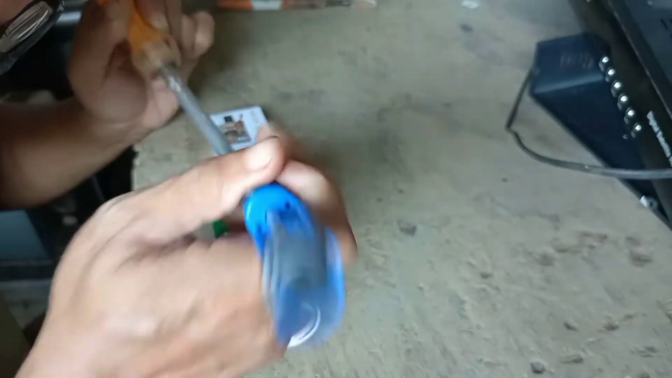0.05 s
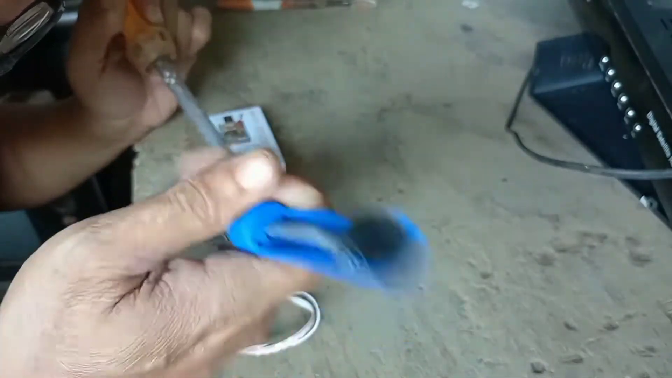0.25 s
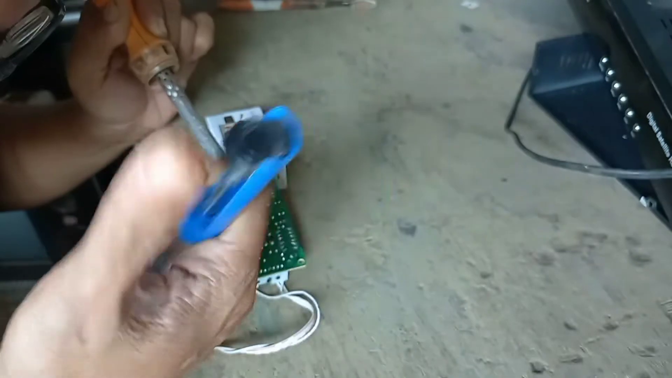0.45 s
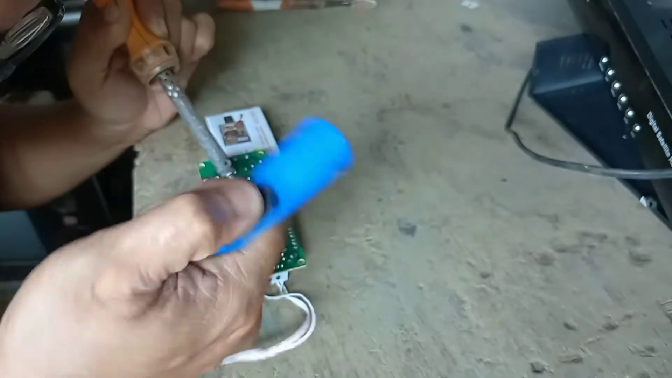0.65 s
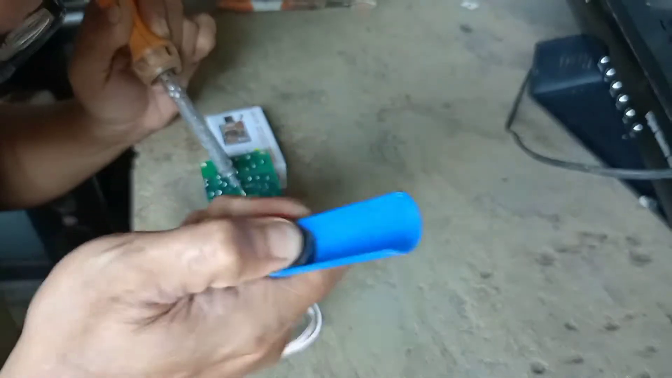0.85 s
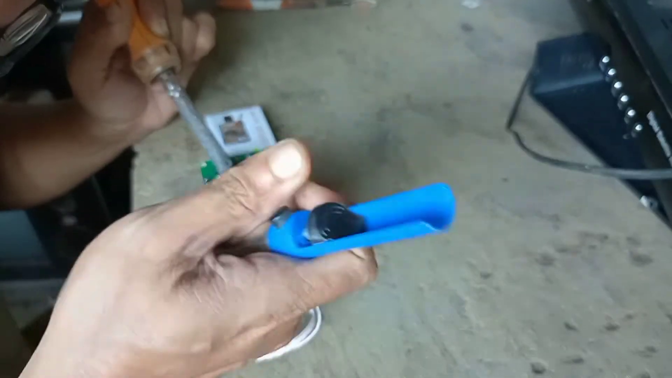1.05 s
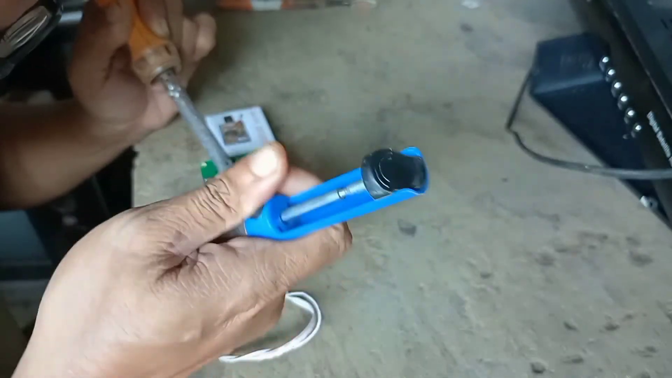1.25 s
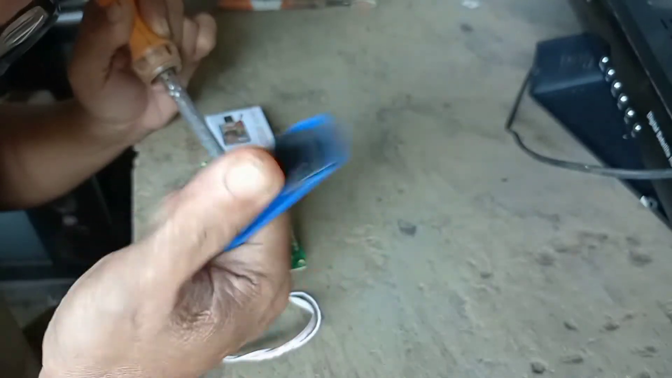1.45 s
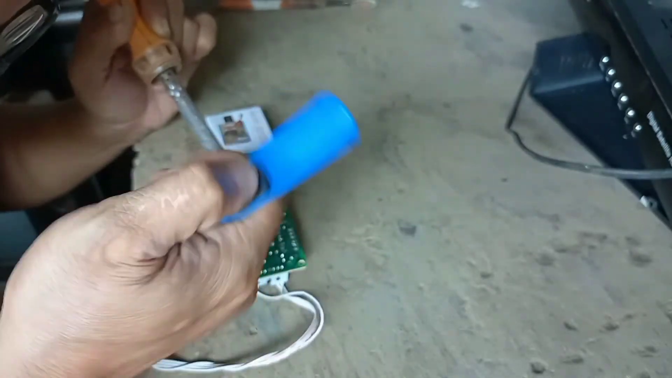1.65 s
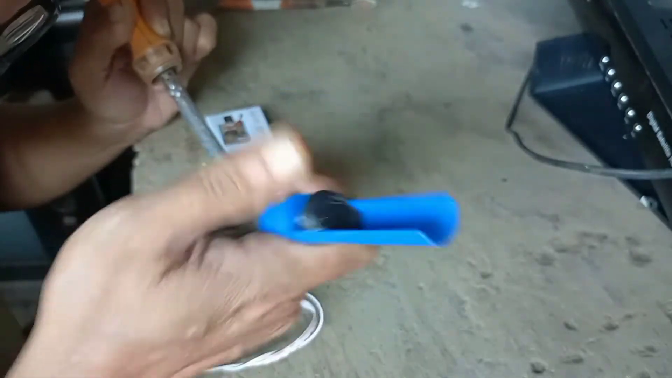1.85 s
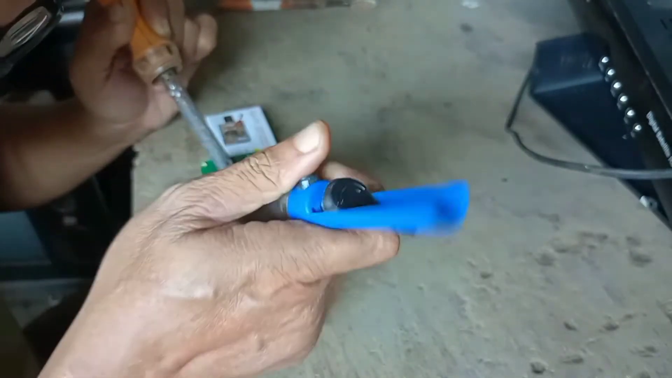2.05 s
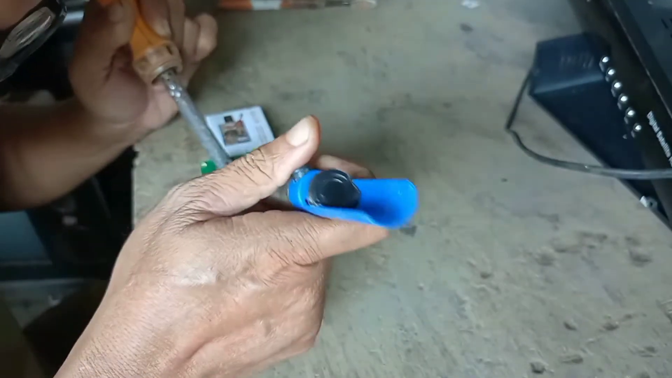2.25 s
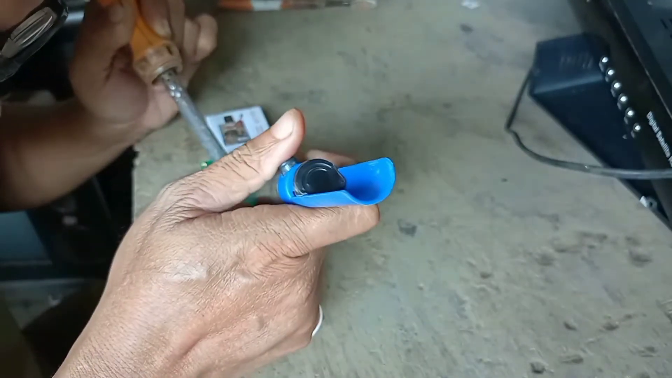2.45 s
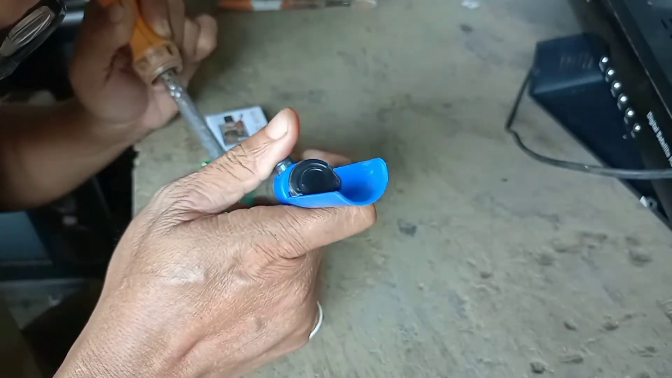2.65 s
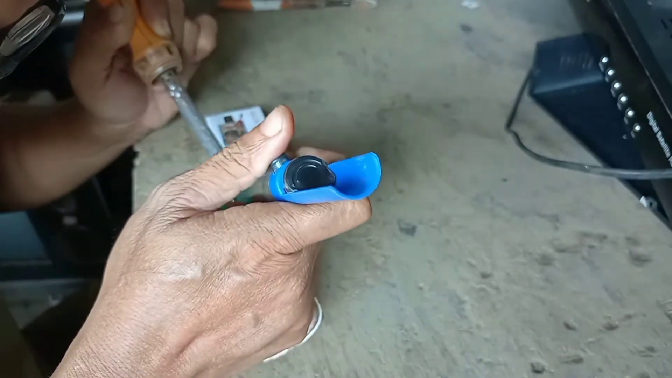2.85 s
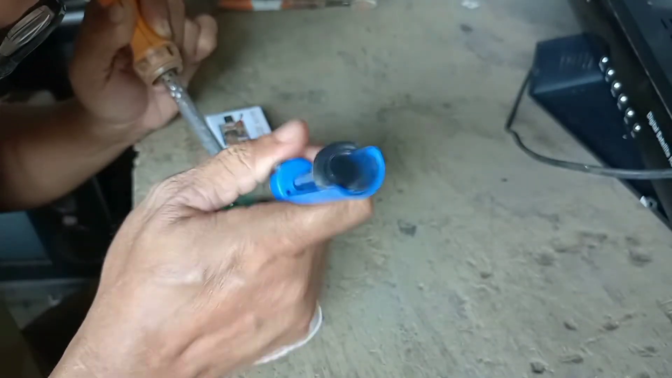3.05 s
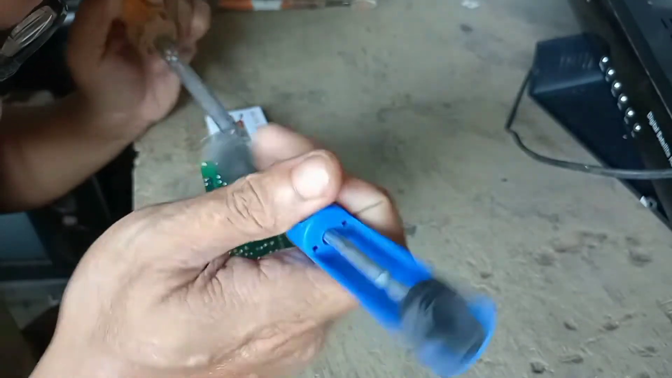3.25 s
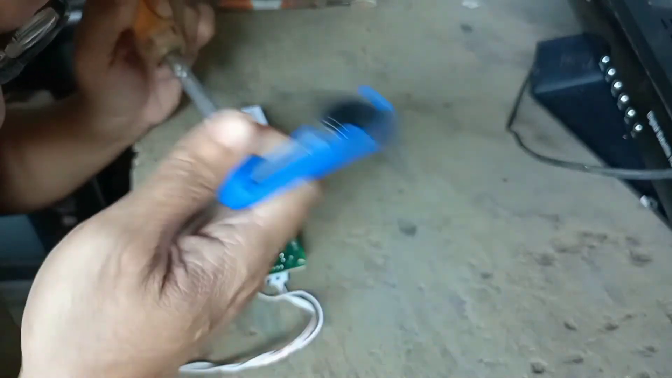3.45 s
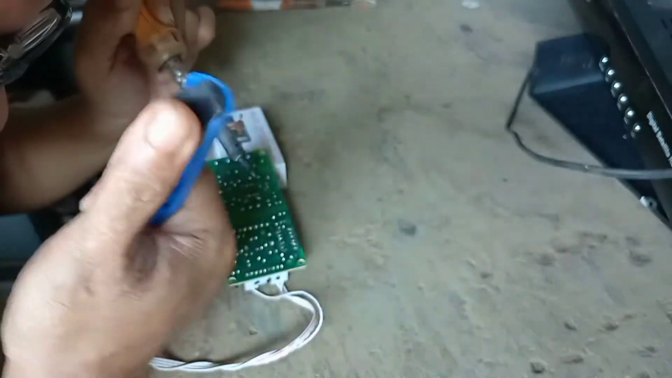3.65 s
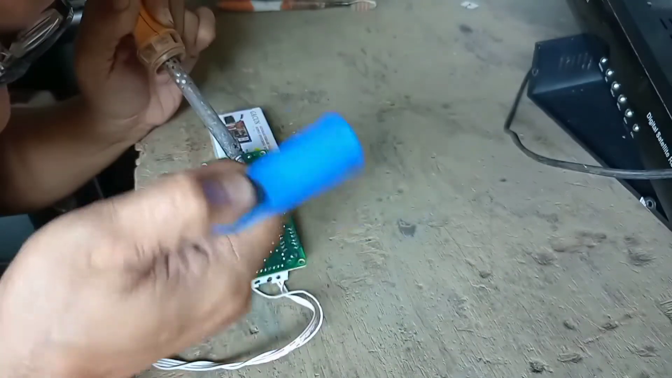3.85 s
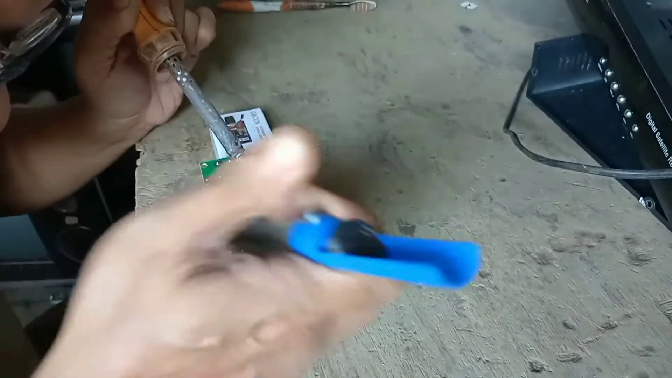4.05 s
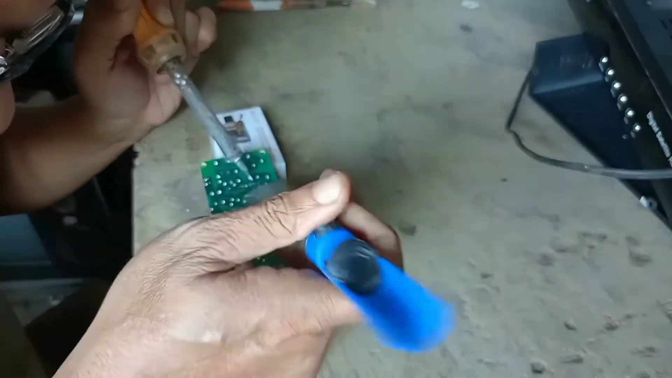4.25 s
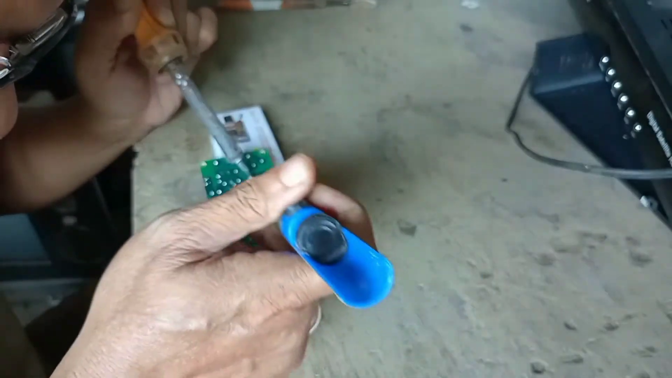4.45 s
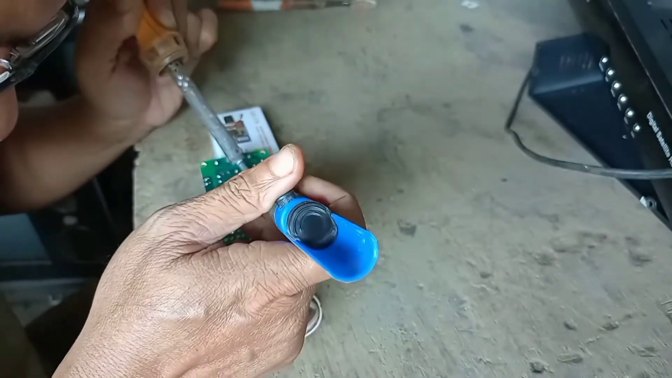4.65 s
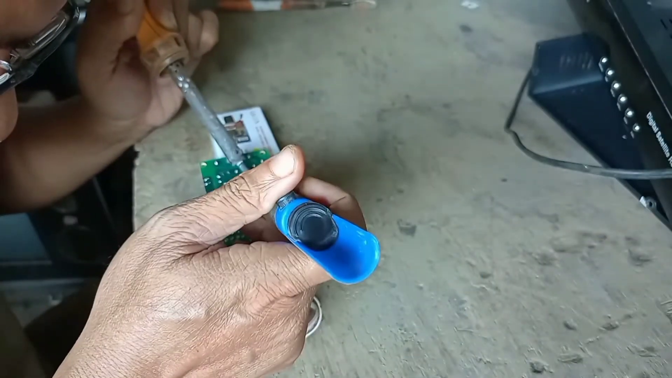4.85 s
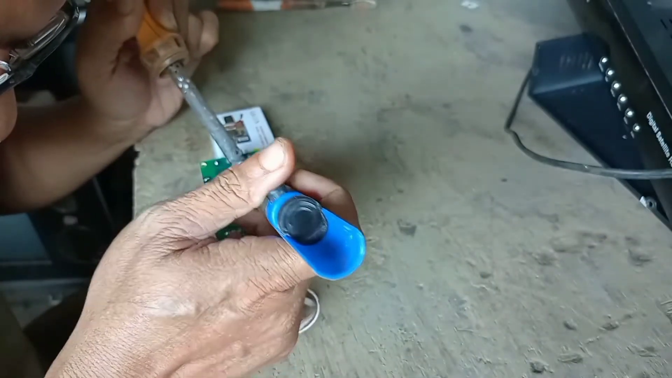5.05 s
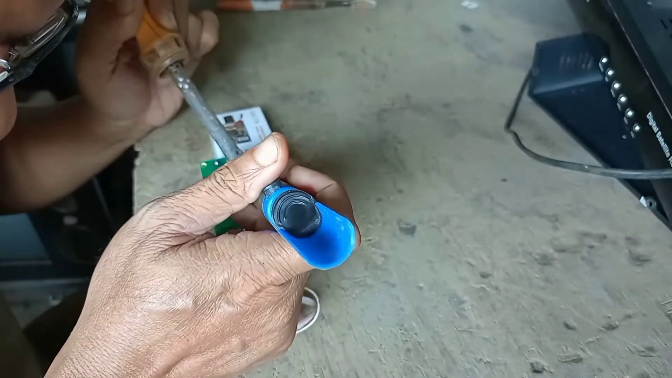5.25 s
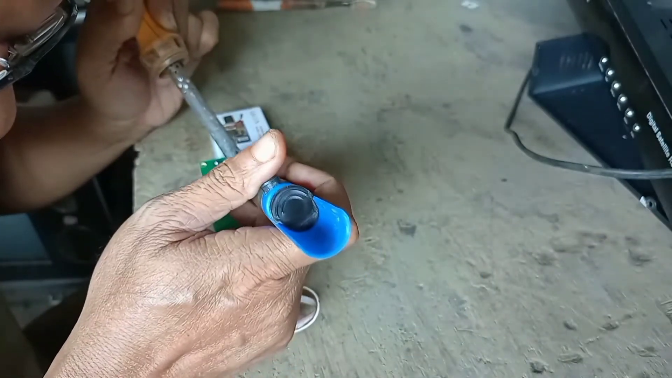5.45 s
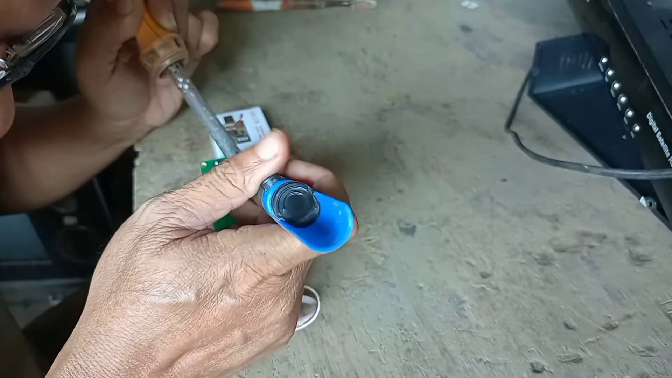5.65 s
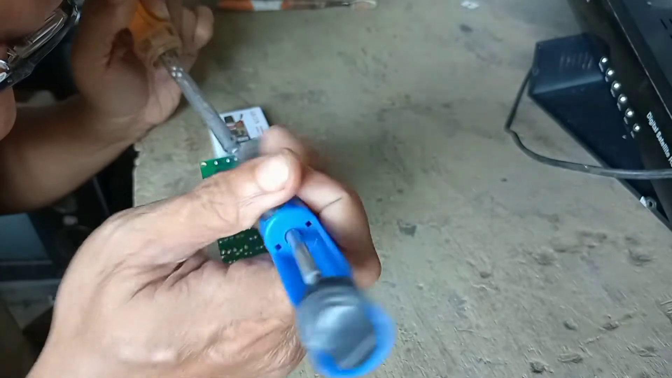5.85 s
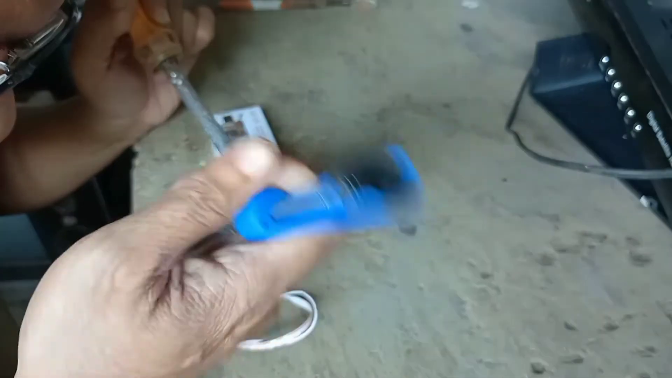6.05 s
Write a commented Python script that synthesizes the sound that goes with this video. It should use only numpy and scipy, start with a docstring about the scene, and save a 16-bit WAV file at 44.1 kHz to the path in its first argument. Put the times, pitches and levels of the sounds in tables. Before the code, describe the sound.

Close, sharp snaps and latch clicks of a spring-loaded solder sucker being fired and reset, above a low hum and faint drone.

```python
"""Desoldering pump, cocked and fired

A plastic pump works close by, over a bench in a small room. Cocking: the piston slides down the barrel,
the latch clicks, the sleeve runs back and knocks on its stop. Firing: the trigger ticks, air rushes in,
the piston slams home and the spring rings. Hum, drone, rumble and hiss lie underneath."""
import sys
import numpy as np
from scipy import signal
from scipy.fft import rfft, irfft, next_fast_len
from scipy.io import wavfile
from scipy.ndimage import uniform_filter1d

SR = 44100
rng = np.random.default_rng(int(sys.argv[2]) if len(sys.argv) > 2 else 0)


def waveform_to_disk(signal):
    """Save audio, clipped to [-1, 1], as 16-bit WAV at the path in sys.argv[1]."""
    frames = np.transpose(np.atleast_2d(signal))
    scaled = np.clip(frames, -1, 1) * 32767
    samples = np.round(scaled).astype(np.int16)
    wavfile.write(sys.argv[1], SR, samples)


N = 269451
TIME_S = np.arange(N) / SR
IMPACT_S = np.arange(4096) / SR  # time axis of one impact

# cocking strokes: (push start [s], latch catch [s], sleeve stop [s], force [dB])
STROKES = [(0.593, 0.6898, .9825, -3), (1.571, 1.6586, 1.8394, 0), (3.709, 3.7922, 3.9852, 5.5)]
# plastic-on-plastic spectrum: (frequency [Hz], level [dB])
RASP_SPECTRUM = [(200, -9.5), (1000, -13.5), (2300, -11.5), (3500, 1.5), (4600, 2), (6000, -7.5), (8000, 0),
                 (10000, 2), (12000, -3.5), (16000, -5)]
# coil spring mode clusters: (frequency [Hz], width [Hz], level [dB])
SPRING_MODES = [(950, 120, 2), (1750, 140, 1), (2330, 150, 2.5), (3147, 330, -6.5), (4640, 840, -6.5),
                (7060, 380, -12.5), (9600, 3000, -12)]


def firings(squeeze_s=.004, usual_travel_s=.012, echo_db=-9.5):
    """Trigger, air rush, slam; a faster piston rings louder and higher. Returns (direct, room send)."""
    # firings: (trigger [s], piston stop [s], slam level [dB])
    shots = [(.0100, 0.0216, -8.5), (1.165, 1.1736, -5), (3.0594, 3.0722, -12), (5.7155, 5.7279, -11.5)]
    # piston slam spectrum: (frequency [Hz], level [dB])
    slam_spectrum = [(100, -13.5), (330, 2.5), (550, -6.5), (900, -5.5), (1400, -4.5), (2300, -2.5),
                     (3200, 0), (4500, -5.5), (6000, -9), (7100, -6), (8000, -9), (9500, -2), (12000, -7),
                     (16000, -13)]
    direct, room_send = np.zeros((2, 2, N))
    for trigger_s, stop_s, slam_db in shots:
        travel_s = stop_s - trigger_s
        speed_doublings = np.log2(usual_travel_s / travel_s)
        trigger_db = -20.5 + 13 * speed_doublings
        ring_db = -19 + 15 * speed_doublings
        ring_hz = 2520 * 2 ** (.7 * speed_doublings)
        spring_db = -60.5 + 39.5 * speed_doublings
        tilt_db_oct = .25 + 2 * speed_doublings
        shot = np.zeros((2, N))
        creak = rub(squeeze_s, slam_spectrum, rough_db=1.5, rise_s=.0035)
        add(shot, trigger_s - squeeze_s, undb(trigger_db - 14) * creak)
        add(shot, trigger_s, undb(trigger_db) * click(slam_spectrum, decay_s=.00084, tilt_db_oct=1.5))
        add(shot, trigger_s, undb(ring_db - 9) * barrel_ring(ring_hz, decay_s=.0035))
        air_rush = rub(travel_s, slam_spectrum, rough_db=4, rise_s=.00068)
        add(shot, trigger_s, undb(-26.5) * air_rush)
        slam = click(slam_spectrum, decay_s=.00055, tilt_db_oct=tilt_db_oct, body_db=-19.5, body_s=.004)
        add(shot, stop_s, undb(slam_db) * slam)
        add(shot, stop_s, undb(ring_db) * barrel_ring(ring_hz))
        direct += shot
        room_send += undb(echo_db - slam_db) * shot  # slams reach the room equally, whatever the aim
        add(direct, stop_s, undb(spring_db) * spring_ring())
    return direct, room_send


def barrel_ring(hz, decay_s=.0017, spacing=.19):
    """Three close modes of the plastic tube, with a different phase in each channel."""
    modes_hz = hz * (1 + spacing * np.array([-1, 0, 1]))[:, None]
    phase = rng.uniform(0, 2 * np.pi, (3, 1)) + .7 * rng.standard_normal((2, 3, 1))
    envelope = np.exp(-IMPACT_S / decay_s) * (1 - np.exp(-IMPACT_S / .0001))
    return np.sin(2 * np.pi * modes_hz * IMPACT_S + phase).sum(axis=1) * envelope * np.sqrt(2 / 3)


def spring_ring(t60_s=1.1):
    """Clusters of close coil modes fade slowly."""
    return resonate(diffuse(SR), SPRING_MODES) * np.exp(-np.log(1000) * TIME_S[:SR] / t60_s)


def cocking(ramp_s=.022):
    """The piston hisses down the barrel, the latch scrapes up its ramp and catches; loose parts tick."""
    # latch spectrum: (frequency [Hz], level [dB])
    latch_spectrum = [(200, -22.5), (900, -25), (2300, -27), (2750, -8), (3150, 2), (3500, 1), (3850, -1),
                      (4200, -5.5), (5800, -17), (7000, -12), (7800, -15.5), (9400, -6.5), (11500, -13.5),
                      (15500, -22)]
    # pump shell spectrum: (frequency [Hz], level [dB])
    shell_spectrum = [(300, -17.5), (2000, -14.5), (4200, -13), (4850, 6.5), (5400, -10.5), (6200, -17),
                      (6900, -0.5), (10200, 0), (11200, -8), (14000, -4.5), (15500, -10.5)]
    # small plastic ticks: (time [s], level [dB])
    ticks = [(0.737, -34), (.7530, -26.5), (1.8148, -33.5), (3.9659, -28)]
    out = np.zeros((2, N))
    for start_s, latch_s, _, force_db in STROKES:
        push_s = latch_s - start_s
        add(out, start_s, undb(-43) * rub(push_s, RASP_SPECTRUM, rough_db=3, rise_s=.0086))
        add(out, start_s, undb(-44) * barrel_chirp(push_s))
        add(out, latch_s - ramp_s, undb(-36) * rub(ramp_s, latch_spectrum, rough_db=1, rise_s=.012))
        catch = click(latch_spectrum, decay_s=.0008, body_db=-17, body_s=.0086)
        shell = click(shell_spectrum, decay_s=.00055, body_db=-22, body_s=.003)
        add(out, latch_s, undb(-10.5) * catch + undb(-20 + force_db) * shell)
    for tick_s, db in ticks:
        add(out, tick_s, undb(db) * click(RASP_SPECTRUM, decay_s=.00073, tilt_db_oct=.5))
    return out


def barrel_chirp(length_s, start_hz=1900, end_hz=560, width_hz=380, fade_s=.058, dip_db=-12):
    """The tube resonance falls as the piston advances; the push eases briefly a third of the way."""
    t = TIME_S[:SR // 4]
    travel = np.minimum(t / length_s, 1)
    hz = start_hz * (end_hz / start_hz) ** travel
    lowpass = signal.butter(2, width_hz / 2, fs=SR, output="sos")
    flutter = unit(signal.sosfilt(lowpass, rng.standard_normal((2, len(t)))))
    phase = 2 * np.pi * np.cumsum(hz) / SR
    envelope = np.exp(-t / fade_s - np.maximum(t - length_s, 0) / .0055)
    dip = undb(dip_db * np.exp(-((travel - .32) / .089) ** 2))
    return near((flutter[0] * np.sin(phase) + flutter[1] * np.cos(phase)) * envelope * dip)


def sleeve(slip_s=.0083, run_s=.0076):
    """The sleeve slips from under the thumb, rasps back and ticks against its stop."""
    out = np.zeros((2, N))
    for _, _, stop_s, force_db in STROKES:
        start_s = stop_s - run_s
        add(out, start_s - slip_s, undb(-29) * rub(slip_s, RASP_SPECTRUM, rough_db=3, rise_s=.018))
        add(out, start_s, undb(-24 + force_db) * rub(run_s, RASP_SPECTRUM, rough_db=-.5, rise_s=.00015))
        add(out, stop_s, undb(-20.5) * click(RASP_SPECTRUM, decay_s=.00098, tilt_db_oct=-6))
    return out


def knocks(thud_hz=150, thud_s=.0041, recoil_thud_db=-16.5, stop_jolt_db=-10, stop_thud_db=-29):
    """Each recoil and sleeve stop gives a dull jolt of the barrel and a low thud of the air in it."""
    # barrel recoils during piston flight: (time [s], jolt level [dB])
    recoils = [(.0134, -8), (3.0653, -9), (5.7184, -18.5)]
    # barrel jolt spectrum: (frequency [Hz], level [dB])
    jolt_spectrum = [(60, -16.5), (200, -2.5), (450, 2), (700, -0.5), (1000, -3), (1500, -5), (2100, -19.5),
                     (3500, -33.5), (8000, -51.5)]
    out = np.zeros((2, N))
    jolt = colour(signal.unit_impulse(len(IMPACT_S)), jolt_spectrum)
    thud = np.sin(2 * np.pi * thud_hz * IMPACT_S) * np.exp(-IMPACT_S / thud_s)
    hits = [(recoil_s, jolt_db, recoil_thud_db) for recoil_s, jolt_db in recoils]
    hits += [(stop_s, stop_jolt_db, stop_thud_db + force_db) for _, _, stop_s, force_db in STROKES]
    for hit_s, jolt_db, thud_db in hits:
        add(out, hit_s, near(undb(jolt_db) * jolt / jolt.max() - undb(thud_db) * thud, pan_db=1))
    return out


def click(spectrum, decay_s, tilt_db_oct=0, body_db=-19, body_s=.007):
    """A hard contact excites all frequencies evenly, then the plastic rings briefly."""
    envelope = np.exp(-IMPACT_S / decay_s) + undb(body_db) * np.exp(-IMPACT_S / body_s)
    burst = rfft(contact_noise(len(IMPACT_S)) * envelope)
    smooth_power = uniform_filter1d(np.mean(abs(burst) ** 2, axis=0), size=110)
    white_burst = np.roll(irfft(burst / np.sqrt(smooth_power)), 12, axis=1)
    end_taper = np.minimum(1, 4 * (1 - IMPACT_S / IMPACT_S[-1])) ** 4
    snap = colour(white_burst, spectrum, tilt_db_oct) * end_taper
    return near(unit(snap) * np.sqrt(.002 / IMPACT_S[-1]))  # energy of 2 ms at rms 1


def rub(length_s, spectrum, rough_db, rise_s):
    """Sliding plastic: a dense train of uneven slips that stops at the end of the travel."""
    t = TIME_S[:SR // 4]
    slips = undb(rough_db * np.repeat(rng.standard_normal(len(t)), 24)[:len(t)])
    envelope = (1 - np.exp(-t / rise_s)) * np.exp(-np.maximum(t - length_s, 0) / .0015)
    return near(unit(colour(contact_noise(len(t)) * slips, spectrum)) * envelope)


def contact_noise(size, independent_gain=.88):
    """White noise; each channel hears a partly different side of the pump."""
    return rng.standard_normal(size) + independent_gain * rng.standard_normal((2, size))


def spring_jangle(level_db=-56):
    """The loaded spring shakes softly in the moving hand."""
    return resonate(diffuse(N), SPRING_MODES) * undb(level_db) * hold(.894, 1.15, fade_s=.07)


def whistles():
    """Faint, thin whistles of narrow-band noise come and go."""
    # whistles: (start [s], length [s], frequency [Hz], level [dB])
    events = [(0.413, 0.16, 3730, -67), (0.853, 0.12, 2510, -52), (0.815, 0.16, 514, -52.5),
              (1.073, 0.11, 950, -52.5), (2.721, .18, 3620, -70.5), (2.908, 0.16, 695, -53.5),
              (5.35, 0.29, 2800, -69)]
    out = np.zeros((2, N))
    for start_s, length_s, hz, db in events:
        size = int(length_s * SR)
        band = resonate(diffuse(size), [(hz, 8 + .014 * hz, 0)])
        add(out, start_s, undb(db) * band * np.sqrt(np.hanning(size)))
    return out


def room(x, t60_s, bloom_s, gap_s, treble_loss=.26):
    """Echoes of both sides of the pump arrive after a gap, thicken and die away, top treble first."""
    # echo spectrum: (frequency [Hz], level [dB])
    echo_spectrum = [(80, -0.5), (250, -4.5), (550, 0.5), (950, -3), (1400, -2.5), (2100, -0.5), (3500, -5),
                     (5500, -2.5), (9500, 0.5), (13000, -1), (16000, 0)]
    t = TIME_S[:SR // 2]
    fade = np.exp(-np.log(1000) * t / t60_s)
    bloom = 1 - np.exp(-np.maximum(t - gap_s, 0) / bloom_s)
    out = 0
    for channel in x:
        noise = diffuse(len(t))
        low = signal.sosfiltfilt(signal.butter(2, 11000, fs=SR, output="sos"), noise)
        response = (low * fade + (noise - low) * fade ** (1 + treble_loss)) * bloom
        response = colour(unit(response) / np.sqrt(2 * len(t)), echo_spectrum)
        out = out + signal.oaconvolve(channel[None], response, axes=1)[:, :N]
    return out


def hum(hz=67.8, rest_db=-61, fade_s=.4):
    """A low, nearly steady tone that comes and goes."""
    # loud spells: (start [s], end [s], level [dB])
    spells = [(0, 1.95, -42.5), (4.6, 6.11, -47.5)]
    lift_db = sum((db - rest_db) * hold(start_s, end_s, fade_s) for start_s, end_s, db in spells)
    return tone(hz * (1 + .0036 * wander(2.6))) * undb(rest_db + lift_db + .65 * wander(6.6))


def drone(rest_hz=165.3, lift_hz=14, rest_db=-54.5, lift_db=8.5, waver_db=2.5):
    """A wavering tone; one swell lifts both pitch and level."""
    lift = swell(peak_s=5.2, rise_s=2.1, fall_s=.748)
    hz = (rest_hz + lift_hz * lift) * (1 + .014 * wander(13))
    return tone(hz) * undb(rest_db + lift_db * lift + waver_db * wander(18))


def rumble(level_db=-39.5, lull_db=-6):
    """Noise in the room's low resonances; it eases once and returns."""
    # room modes: (frequency [Hz], width [Hz], level [dB])
    room_modes = [(41, 12, -7.5), (66, 17, -1), (97.5, 11, 0), (119, 10, 1.5), (142, 13, 4.5),
                  (171, 17, -5), (215, 90, -7.5), (264, 16, -12.5), (273, 8, -9.5)]
    lull = swell(peak_s=3.3, rise_s=2, fall_s=2.1)
    return resonate(diffuse(N), room_modes) * undb(level_db + lull_db * lull)


def hiss(level_db=-56):
    """Soft, diffuse noise whose level drifts slightly."""
    # ambient noise spectrum: (frequency [Hz], level [dB])
    air_spectrum = [(180, -25), (300, -1.5), (354, -18.5), (470, -15), (528, -20), (801, -19.5),
                    (1390, -27), (2740, -33), (3240, -35), (3700, -33.5), (5250, -45.5), (13100, -41.5),
                    (16000, -52.5)]
    return unit(colour(diffuse(N), air_spectrum)) * undb(level_db + .5 * wander(1.5))


def near(x, pan_db=3, lag_s=.00015):
    """Sound at the hand reaches the left microphone first and louder; its top treble is narrow."""
    # side gain of close sounds: (frequency [Hz], gain [dB])
    side_gain = [(4000, 0), (8000, -4.5), (13000, -8.5)]
    left, right = np.broadcast_to(x, (2, x.shape[-1]))
    left = left * undb(pan_db / 2)
    right = np.pad(right, (int(lag_s * SR), 0))[:len(right)] * undb(-pan_db / 2)
    mid, side = (left + right) / 2, colour((left - right) / 2, side_gain)
    return np.array([mid + side, mid - side])


def diffuse(size):
    """Stereo noise from all around: alike in the bass, wide in the midrange."""
    # diffuse field width: (frequency [Hz], side minus mid [dB])
    width = [(60, -10.5), (140, -18.5), (250, -13), (600, -2.5), (2000, 0), (5000, 1), (8000, -9),
             (13000, -17.5)]
    mid, side = rng.standard_normal((2, size))
    hz, side_db = np.transpose(width)
    total_db = 10 * np.log10(1 + undb(side_db) ** 2)
    mid, side = colour(mid, np.c_[hz, -total_db]), colour(side, np.c_[hz, side_db - total_db])
    return np.array([mid + side, mid - side])


def colour(x, points, tilt_db_oct=0):
    """Minimum-phase filter through (frequency [Hz], gain [dB]) points, tilted about 4 kHz."""
    size = 2 * next_fast_len(x.shape[-1] // 2 + 1)
    octave = np.log2(np.maximum(np.fft.rfftfreq(size, 1 / SR), 1))
    hz, db = np.transpose(points)
    gain_db = np.interp(octave, np.log2(hz), db) + tilt_db_oct * np.maximum(octave - np.log2(4000), -2)
    cepstrum = irfft(gain_db * np.log(10) / 20)
    cepstrum[1:size // 2] *= 2  # fold onto positive time: causal
    cepstrum[size // 2 + 1:] = 0
    return irfft(rfft(x, size) * np.exp(rfft(cepstrum)))[..., :x.shape[-1]]


def resonate(x, modes):
    """Weight noise by (frequency [Hz], width [Hz], level [dB]) resonances; rms 1."""
    size = 2 * next_fast_len(x.shape[-1] // 2 + 1)
    bins_hz = np.fft.rfftfreq(size, 1 / SR)
    power = sum(undb(db) ** 2 / (1 + ((bins_hz - hz) / width_hz) ** 2) ** 2 for hz, width_hz, db in modes)
    return unit(irfft(rfft(x, size) * np.sqrt(power), size)[:, :x.shape[-1]])


def tone(hz):
    """Sine of rms 1 along a frequency curve."""
    return np.sqrt(2) * np.sin(2 * np.pi * np.cumsum(hz) / SR)


def wander(rate_hz):
    """Smooth random curve with spread near 1."""
    steps = np.interp(TIME_S * rate_hz, np.arange(1000), rng.standard_normal(1000))
    return 1.3 * uniform_filter1d(steps, int(SR / rate_hz))


def hold(start_s, end_s, fade_s):
    """1 between two times, with a linear ramp to 0 on either side."""
    return np.clip(1 + np.minimum(TIME_S - start_s, end_s - TIME_S) / fade_s, 0, 1)


def swell(peak_s, rise_s, fall_s):
    """Asymmetric bell curve of height 1."""
    return np.exp(-((TIME_S - peak_s) / np.where(TIME_S < peak_s, rise_s, fall_s)) ** 2)


def add(out, start_s, x):
    """Mix x into out at start_s."""
    i = max(int(start_s * SR), 0)
    out[:, i:i + x.shape[-1]] += x[..., :N - i]


def undb(db):
    """Decibels to gain."""
    return 10 ** (np.asarray(db) / 20)


def unit(x):
    """Scale to rms 1."""
    return x / np.sqrt(np.mean(x ** 2))


def scene():
    """The pump close by, its echoes and the background."""
    shots, shot_send = firings()
    cocks, returns, thumps = cocking(), sleeve(), knocks()
    walls = room(undb(-4) * shot_send + undb(-8) * cocks, t60_s=.37, bloom_s=.017, gap_s=.005)
    # the hand covers the sleeve, so mostly the bench answers it
    bench = room(undb(-10) * returns + undb(-11) * thumps, t60_s=.24, bloom_s=.0027, gap_s=.0017)
    pump = shots + cocks + returns + thumps + spring_jangle()
    return pump + walls + bench + whistles() + hum() + drone() + rumble() + hiss()


def record(dry, low_hz=33, top_hz=15900):
    """Roll off the deep bass, clip at full scale, cut the top."""
    highpass = signal.butter(4, low_hz, "high", fs=SR, output="sos")
    lowpass = signal.ellip(10, .2, 85, top_hz, fs=SR, output="sos")
    return signal.sosfilt(lowpass, np.clip(signal.sosfilt(highpass, dry), -1, 1))


dry = scene()
out = record(dry)
waveform_to_disk(out)
```